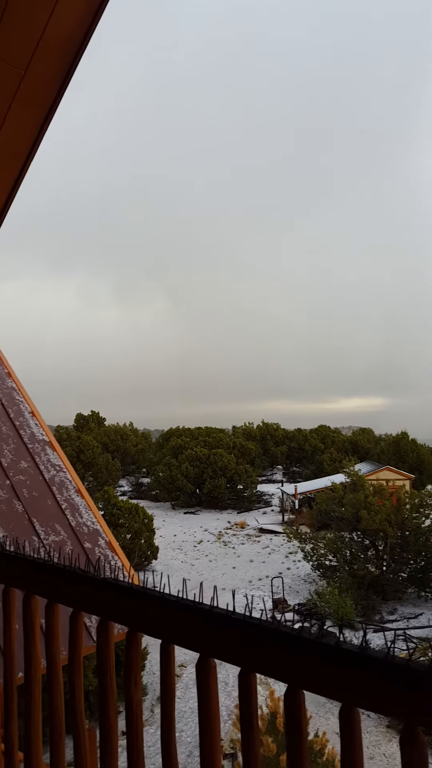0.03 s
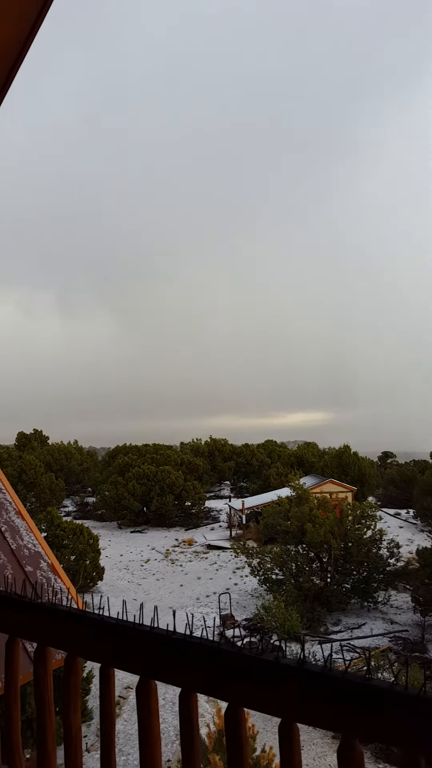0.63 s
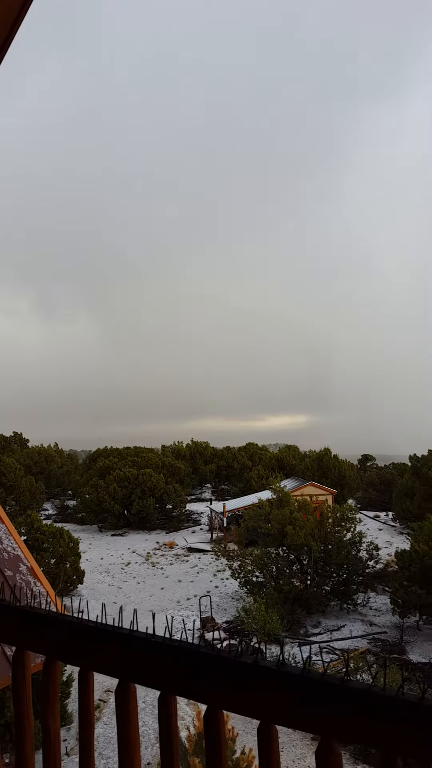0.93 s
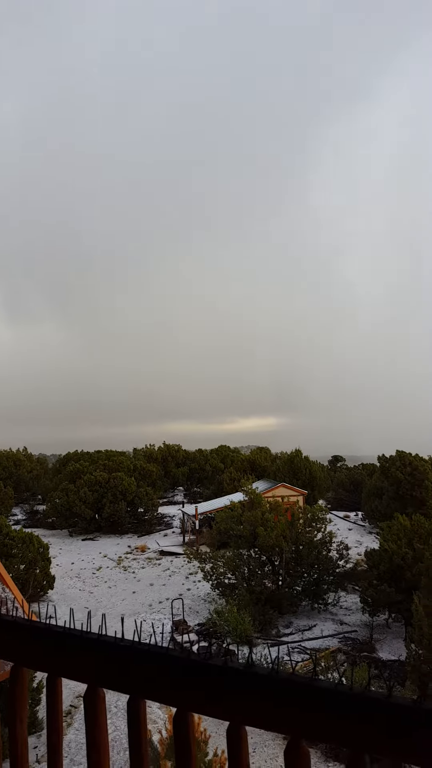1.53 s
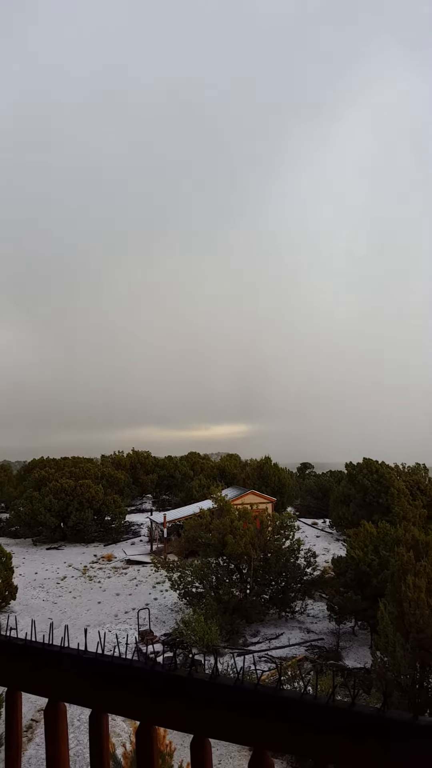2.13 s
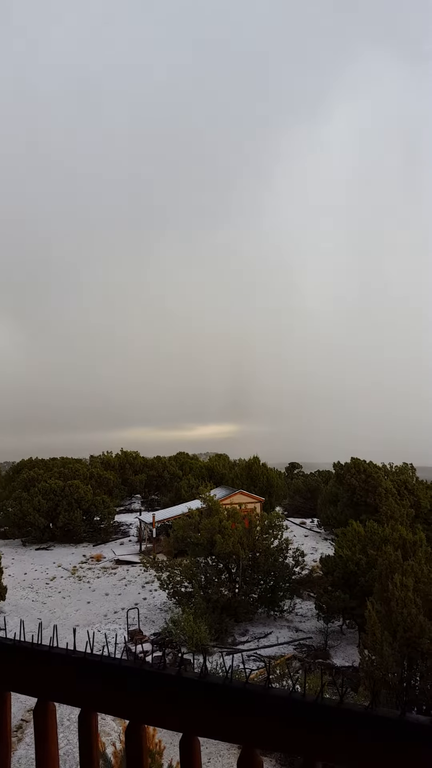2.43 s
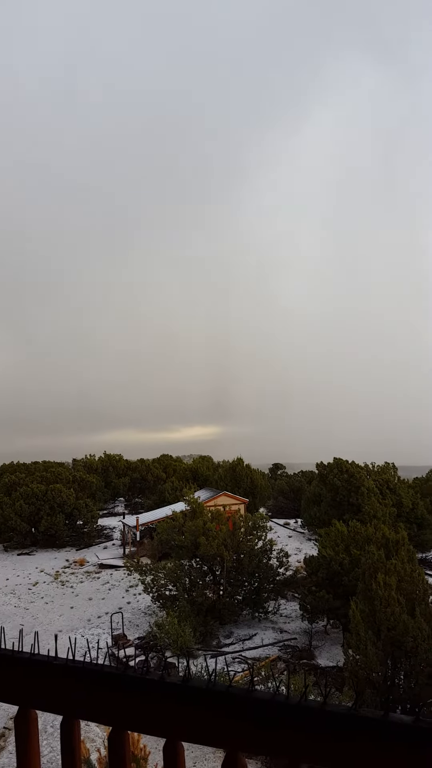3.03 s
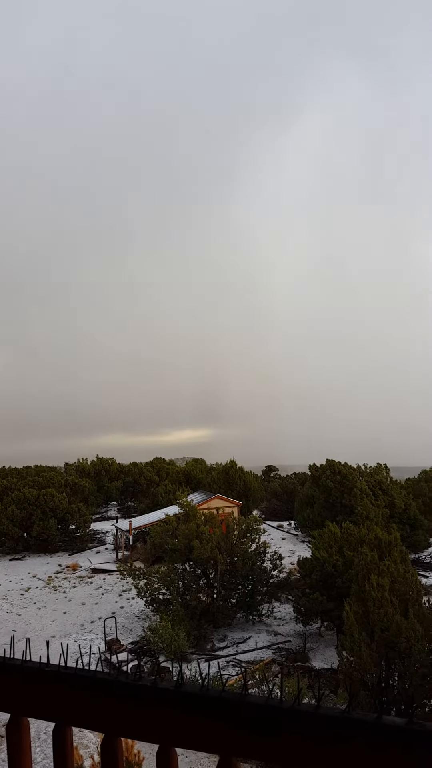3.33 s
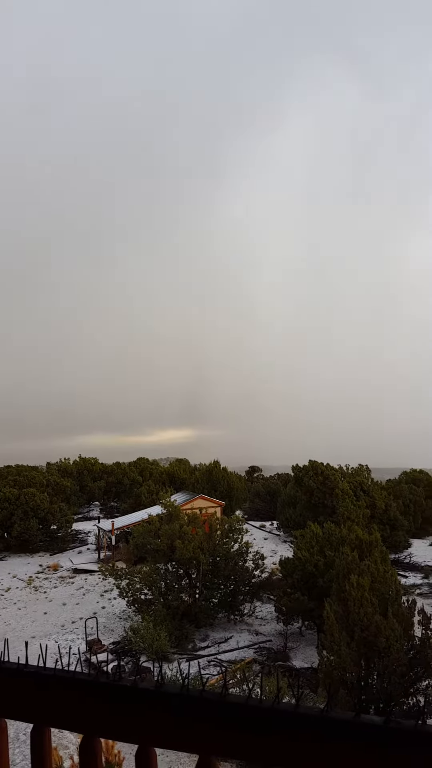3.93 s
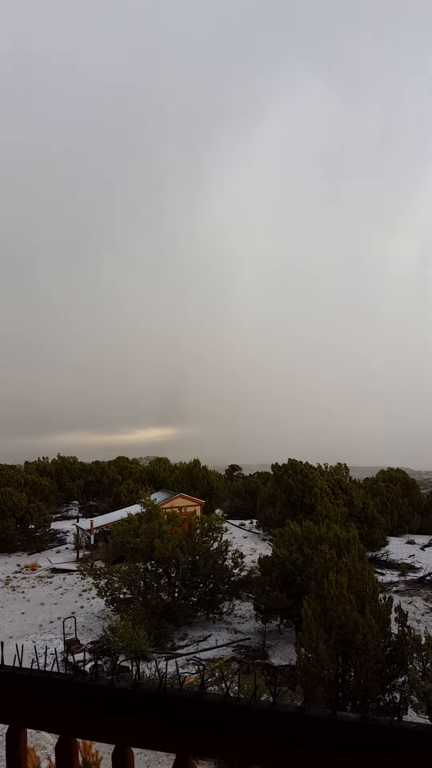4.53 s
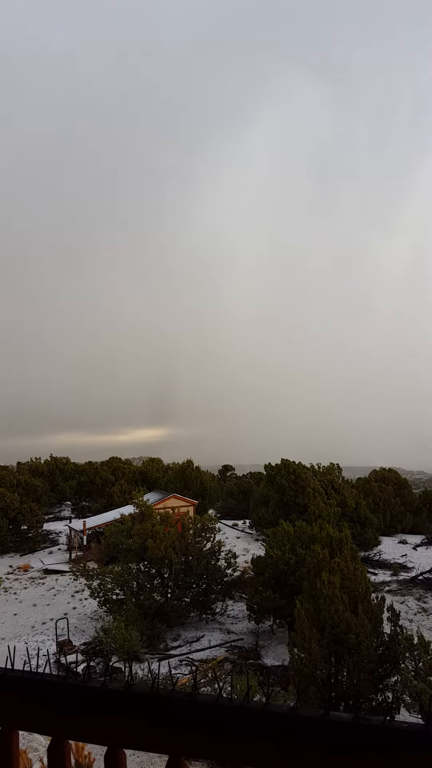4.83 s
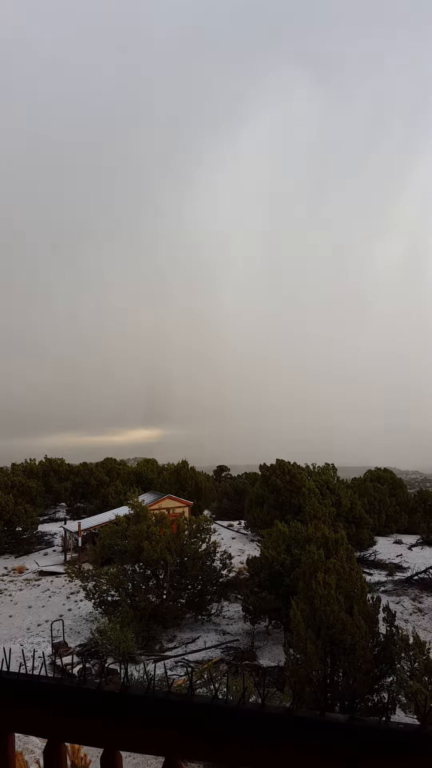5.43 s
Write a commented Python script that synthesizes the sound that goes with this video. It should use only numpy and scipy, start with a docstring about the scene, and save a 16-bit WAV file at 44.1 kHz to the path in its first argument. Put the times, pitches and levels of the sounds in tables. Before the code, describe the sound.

Fine sleet hisses softly outdoors, then a distant grumble swells into loud, booming thunder that keeps rolling and deepening.

```python
"""Thunder over a snowy valley

From a wooden balcony, under the eaves, in fine sleet. A faint grumble comes from far off; then crowds
of shock waves arrive from the lightning channel and swell into claps, deeper as the distance grows.
Pellets hiss, patter and rustle all round, a few ticks sound close to the microphone, and a low drone
lies underneath."""
import sys
import numpy as np
from scipy import signal
from scipy.fft import rfft, irfft, next_fast_len
from scipy.io import wavfile
from scipy.ndimage import uniform_filter1d, minimum_filter1d

SR = 44100
rng = np.random.default_rng(int(sys.argv[2]) if len(sys.argv) > 2 else 0)


def materialize(psi):
    """Save the field psi as 16-bit PCM at rate SR to the path in sys.argv[1].

    A 1-D psi becomes a single channel; in a 2-D psi each row is a channel.
    """
    bounded = np.clip(np.atleast_2d(psi).T, -1, 1)
    quanta = np.round(bounded * 32767).astype(np.int16)
    wavfile.write(sys.argv[1], SR, quanta)


N = 246959
T = np.arange(N) / SR
FFT_SIZE = next_fast_len(N, True)
HZ = np.maximum(np.arange(FFT_SIZE // 2 + 1) * SR / FFT_SIZE, 1)
ROLL_START_S = 2.229

# stereo width at the two microphone ports: (frequency [Hz], side minus mid [dB])
STEREO_WIDTH = [(50, -31), (150, -18.5), (300, -12.5), (500, -3.5), (660, -7.5), (950, 1), (1550, 4),
                (2400, -1), (5000, 4)]


def undb(db):
    """Decibels to gain."""
    return 10 ** (np.asarray(db) / 20)


def curves(table):
    """One gain over time for each level column of (time [s], level [dB], ...)."""
    times, *columns = np.transpose(table)
    return [undb(np.interp(T, times, db)) for db in columns]


def colour(points):
    """Gain at each frequency from (frequency [Hz], level [dB]) points."""
    hz, db = np.transpose(points)
    return undb(np.interp(np.log(HZ), np.log(hz), db))


def resonance(hz, width_hz):
    """Response of one damped resonance, gain 1 at its centre."""
    return 1 / (1 + 1j * (HZ / hz - hz / HZ) * hz / width_hz)


def peaks(modes):
    """Summed gain of resonant peaks given as (centre [Hz], width [Hz], level [dB])."""
    return sum(undb(db) * np.abs(resonance(hz, width)) ** 2 for hz, width, db in modes)


def below(hz, order):
    """Low-pass gain."""
    return 1 / np.sqrt(1 + (HZ / hz) ** (2 * order))


def causal(gain):
    """Minimum-phase response with this gain: it rings only after a blow."""
    cepstrum = irfft(np.log(gain + 1e-6), FFT_SIZE)
    first_half = np.arange(FFT_SIZE) < FFT_SIZE // 2
    return np.exp(rfft(2 * cepstrum * first_half) - cepstrum[0])


def through(x, response):
    """Filter by a frequency response."""
    return irfft(rfft(x, FFT_SIZE) * response, FFT_SIZE)[..., :N]


def ports():
    """Mid and side response of the microphone: bass is nearly the same at both ports."""
    return np.array([np.ones(len(HZ)), colour(STEREO_WIDTH)])


def unit(x):
    """Scale a mid and side pair so that the mid has rms 1."""
    return x / np.std(x[0])


def even(x, span_s):
    """Ride the gain of a mid and side pair so that the mid stays near rms 1 over each span."""
    power = uniform_filter1d(x[0] ** 2, int(span_s * SR))
    return x / np.sqrt(uniform_filter1d(power, int(span_s * SR / 2)) + 1e-18)


def impacts(per_s, spread_db):
    """Randomly timed impulses of uneven size, as mid and side."""
    hits = (rng.random((2, N)) < per_s / SR) * rng.standard_normal((2, N))
    return hits * undb(spread_db * np.minimum(rng.exponential(size=(2, N)), 4))


def swell(start_s, length_s, attack_s, release_s):
    """Envelope that rises, holds until its length is over, and dies away."""
    rise = np.clip((T - start_s) / attack_s, 0, 1)
    return rise * np.exp(-np.maximum(T - start_s - length_s, 0) / release_s)


def drone():
    """A steady, rough low drone in the background."""
    # peaks of the drone: (centre [Hz], width [Hz], level [dB])
    modes = [(52, 70, -8), (87.8, 13, 5.5), (101.7, 7.7, 3.5), (125.7, 17, 5), (155.3, 8.8, 1),
             (159, 36, -8), (240, 150, -8), (360, 210, -15.5), (727, 310, -11.5)]
    hum = even(through(rng.standard_normal((2, N)), peaks(modes)), span_s=0.11)
    return undb(-42) * through(hum, ports())


def sleet():
    """Far pellets merge into hiss; near ones patter on the wooden rail. Both come in small flurries."""
    # the fall slowly eases: (time [s], level [dB])
    easing = [(0.02, -51.5), (.82, -52.5), (.92, -54), (1.05, -52.5), (1.93, -54), (3.7, -56),
              (4.88, -57.5), (5.42, -56), (5.5, -58)]
    # spectrum of the far pellets: (frequency [Hz], level [dB])
    hiss_colour = [(700, 9.5), (1000, 2.5), (1400, 6.5), (2200, 3), (2700, 3.5), (3400, -1.5), (4300, -1),
                   (9200, -8), (11800, -6.7), (13300, -6), (14700, -10), (15600, -16)]
    far_flurry, near_flurry = unit(through(rng.standard_normal((2, N)), below(11.4, order=2)))
    # each pellet skitters for a moment where it lands
    skitter = rfft(rng.standard_normal(N) * np.exp(-T / .0025), FFT_SIZE)
    wash = rng.standard_normal((2, N))
    pellets = unit(through(impacts(per_s=900, spread_db=3), skitter))
    tone = colour(hiss_colour) * (1 - below(260, order=1))
    hiss = through(wash + undb(-4.5) * pellets, causal(tone))
    hiss /= np.std(through(hiss[0], HZ > 3500))  # the treble sets the level
    patter = unit(through(impacts(per_s=1800, spread_db=-2.5), resonance(2700, 2500) ** 2))
    fall = undb(1 + .8 * far_flurry) * hiss + undb(-13.5 + 7 * np.tanh(near_flurry)) * patter
    return curves(easing)[0] * fall


def rustles():
    """Brief soft swells of fine grains in the sleet."""
    # rustles: (start [s], length [s], level [dB], centre [Hz])
    swells = [(0.05, 0.03, -49.5, 2390), (0.517, 0.034, -50.5, 2000), (0.757, 0.088, -52, 2100),
              (0.962, .018, -52, 4470), (1.047, 0.097, -50.5, 2100), (1.712, 0.024, -46.5, 1500),
              (1.977, .04, -53, 2480), (3.155, 0.056, -55.5, 5950), (3.365, 0.14, -55, 6900),
              (5.047, 0.045, -52.5, 5000), (5.205, 0.098, -59, 4970)]
    out, q = np.zeros((2, N)), 0.52
    for start, length, db, hz in swells:
        grains = unit(through(impacts(per_s=9000, spread_db=1.5), resonance(hz, hz / q) ** 2))
        out += undb(db) * swell(start, length, attack_s=0.011, release_s=0.016) * grains
    return out


def ticks():
    """Short ticks close to the microphone, each with a weak tail off the wooden walls."""
    # close ticks: (time [s], level [dB], centre [Hz], width [Hz], decay [s])
    hits = [(0.2653, -45, 4200, 3000, 0.0033), (.315, -45, 3000, 4000, .003), (0.45, -48, 3200, 4000, .004),
            (0.756, -45, 3200, 2400, 0.0055), (.81, -41.5, 1900, 1800, .007),
            (0.8598, -44.5, 4500, 6000, 0.011), (0.9625, -45, 4200, 5000, 0.007),
            (1.059, -50, 5500, 5000, .003), (1.432, -47, 4500, 8000, .008), (3.2025, -47, 5000, 8000, .003),
            (3.961, -35.5, 4440, 3370, 0.0038), (3.966, -46, 3600, 4500, 0.025),
            (4.3683, -37.5, 9500, 5000, 0.0016), (5.054, -50, 13000, 9000, 0.018),
            (5.1507, -44, 8500, 6000, .002), (5.288, -52, 12500, 6000, 0.0073)]
    out, size = np.zeros((2, N)), 8192
    age = T[:size]
    burst_hz = np.arange(size // 2 + 1) * SR / size
    attack = 1 - np.exp(-age / .0004)
    wall_tail = undb(-16) * np.exp(-age / .025)
    for time, db, hz, width, decay in hits:
        envelope = attack * (np.exp(-age / decay) + wall_tail)
        tone = np.interp(burst_hz, HZ, np.abs(resonance(hz, width)) ** 2)
        burst = unit(irfft(rfft(rng.standard_normal((2, size))) * tone))
        start = int(time * SR)
        out[:, start:start + size] += undb(db) * envelope * burst
    return out


def grumble():
    """The first weak shocks from far off ring the balcony until the main peal takes over."""
    # far grumbles, each round its own pitch: (start [s], length [s], level [dB], pitch [Hz])
    swells = [(0.0, 0.35, -56, 331), (.64, 0.09, -52.5, 313), (0.774, 0.031, -41.5, 300),
              (1.011, 0.085, -41.5, 294), (1.203, 0.079, -41, 294), (1.465, 0.023, -40.5, 293),
              (1.579, 0.089, -40.5, 301), (1.709, 0.09, -42.5, 287), (1.969, 0.094, -38, 285),
              (2.327, 0.14, -32, 288), (2.509, 0.12, -30.5, 269)]
    # resonances of the balcony: (centre [Hz], width [Hz], level [dB])
    balcony_modes = [(223, 6.1, 1), (373, 8.9, -11), (382, 73, -6), (650, 22, -7.5), (710, 34, -11.5),
                     (840, 430, -17)]
    out = np.zeros((2, N))
    balcony = peaks(balcony_modes)
    shocks = impacts(per_s=1300, spread_db=3.5)
    for start, length, db, hz in swells:
        tone = balcony + undb(7) * np.abs(resonance(hz, width_hz=22)) ** 2
        ring = even(through(shocks, tone), span_s=0.045)
        out += undb(db) * swell(start, length, attack_s=0.028, release_s=0.058) * ring
    return through(out, ports())


def booms():
    """Hollow booms: shocks that follow each other at a near-even pace gather round one pitch."""
    # booms: (peak time [s], half length [s], centre [Hz], width [Hz], level [dB])
    swells = [(2.236, 0.0062, 236, 50, -27.5), (2.635, .02, 300, 28, -28.5), (2.7, 0.031, 49.7, 54, -24),
              (2.787, 0.13, 182.5, 10, -22), (2.773, 0.028, 232.5, 14, -24), (2.818, 0.047, 798, 75, -23),
              (2.823, 0.044, 55.6, 62, -27), (2.92, 0.017, 144, 68, -18), (3.02, 0.022, 220, 71, -22),
              (3.334, .06, 48, 40, -36), (3.691, 0.019, 92, 26, -28.5), (3.775, 0.014, 99, 23, -21),
              (4.01, 0.014, 105, 24, -19), (4.212, 0.022, 104, 15, -30.5), (4.458, 0.016, 100, 49, -19),
              (4.575, 0.012, 99, 24, -20.5), (4.718, 0.0116, 123, 47, -15), (4.89, 0.023, 121, 41, -21),
              (4.95, 0.014, 168, 64, -15.5), (5.076, 0.035, 170.7, 26, -21.5), (5.104, 0.026, 45, 41, -22),
              (5.205, 0.018, 175, 28, -21), (5.388, 0.021, 270, 25, -18), (5.356, 0.016, 176, 43, -21),
              (5.462, 0.0076, 104, 58, -20)]
    out = np.zeros((2, N))
    for time, half_length, hz, width, db in swells:
        ring = even(through(rng.standard_normal((2, N)), resonance(hz, width) ** 2), span_s=0.078)
        out += undb(db) * np.exp(-.5 * ((T - time) / half_length) ** 2) * ring
    return through(out, ports())


def cracks():
    """Abrupt volleys of shocks from kinks in the channel, their top dulled by the air."""
    # cracks within the roll: (start [s], length [s], level [dB], centre [Hz])
    volleys = [(2.232, 0.0086, -37, 1100), (2.263, .008, -35, 1500), (2.399, 0.013, -30.5, 1200),
               (2.607, 0.0087, -26.5, 740), (2.686, 0.014, -27.5, 890), (2.774, 0.054, -23.5, 446),
               (2.965, 0.016, -27.5, 1100), (3.01, 0.024, -24, 373), (3.287, 0.026, -29.5, 450),
               (3.803, 0.028, -31.5, 1200), (3.91, 0.015, -31, 650), (3.968, .008, -30, 1300),
               (3.997, 0.012, -27.5, 875), (4.327, 0.015, -26, 1310), (4.802, 0.016, -32, 600),
               (5.189, 0.011, -25, 1030), (5.344, 0.023, -26, 700), (5.473, 0.017, -26, 885)]
    out, q = np.zeros((2, N)), 0.86
    path = below(1620, order=5) * ports()
    shocks = impacts(per_s=4400, spread_db=3.5)
    for start, length, db, hz in volleys:
        volley = even(through(shocks, path * resonance(hz, hz / q) ** 2), span_s=0.02)
        out += undb(db) * swell(start, length, attack_s=0.0097, release_s=0.0077) * volley
    return out


def valley_path():
    """Response to one shock that crosses the valley air and rings the space under the eaves."""
    # spectrum of the thunder: (frequency [Hz], level [dB])
    shock_colour = [(20, -79), (42, -8), (62, -15), (88, 3.5), (135, 2.5), (205, -5.5), (330, -7),
                    (450, -8.5), (820, -9), (1200, -19), (1600, -20), (2100, -27), (3000, -56.5)]
    # resonances under the eaves: (centre [Hz], width [Hz], level [dB])
    eaves_modes = [(170, 15, 3), (182, 6.2, 4), (266, 5, -0.5), (296, 22, -1), (371, 19, -3.5),
                   (601, 53, -6.5)]
    eaves_power = sum(np.abs(2 * undb(db) * resonance(hz, width)) ** 2 for hz, width, db in eaves_modes)
    air = below(2080, order=4)
    return causal(colour(shock_colour) * np.sqrt(1 + eaves_power) * air)


def claps(path):
    """Stretches of channel side-on to the microphone arrive as one shock: near ones bang, far ones thud."""
    # strong single shocks: (time [s], peak level [dB], dulled above [Hz])
    arrivals = [(2.262, -24, 1800), (2.541, -14, 1090), (2.67, -12, 800), (2.743, -15, 500),
                (2.809, -16, 700), (2.83, -10.5, 1200), (2.86, -10, 900), (2.933, -10, 900),
                (2.983, -10, 1200), (3.018, -14, 600), (3.167, -24, 250), (3.279, -30, 300),
                (3.39, -21, 400), (3.525, -25, 700), (3.654, -20, 250), (3.827, -19, 200),
                (3.912, -17, 900), (3.973, -17, 347), (4.332, -16, 500), (4.456, -17, 250),
                (4.699, -16, 600), (4.719, -19, 180), (4.805, -15, 250), (4.827, -18, 180),
                (4.874, -16, 400), (4.896, -8.5, 250), (4.954, -20, 222), (5.116, -17, 700),
                (5.207, -12, 250), (5.223, -6, 1000), (5.363, -9.5, 400), (5.518, -17, 350)]
    out, size = np.zeros(N), 8192
    front = irfft(path, FFT_SIZE)[:size]
    for time, db, cutoff_hz in arrivals:
        shock = signal.sosfilt(signal.butter(2, cutoff_hz, fs=SR, output="sos"), front)
        shock /= np.abs(shock).max()
        start = int(time * SR)
        out[start:start + size] += undb(db) * shock[:N - start]
    return np.array([out, undb(-20) * out])


def roll_gains():
    """Gains of the roll's five bands, low to high: surges add their power to the scattered rumble."""
    # rumble between the surges: (time [s], level [dB], extra crackle [dB])
    rumble_levels = [(2.25, -33, 1), (3.1, -30.5, 4.5), (3.23, -32, 2), (3.4, -31, 3), (3.6, -30.5, -1),
                     (3.93, -31, 3.5), (4.1, -30, 0), (4.24, -30, 4.5), (4.38, -27, 4), (4.68, -30, 3),
                     (4.76, -31, 3.5), (4.84, -25, -1.5), (5.02, -25.5, -3), (5.6, -20.5, -2)]
    # one surge for each stretch of the channel:
    # (start [s], length [s], level [dB], extra bass [dB], extra crackle [dB])
    surges = [(2.252, 0.018, -34, 9, 8), (2.325, 0.15, -33, 0.5, 4.5), (2.528, 0.015, -37.5, 7, 16),
              (2.611, 0.021, -32, -7.5, -9), (2.646, 0.09, -21, -10, -1.5), (2.747, 0.1, -20, -1, -0.5),
              (2.833, 0.17, -23, -2.5, 6), (3.113, 0.064, -26, 2, -1.5), (3.247, 0.072, -29, -1.5, -4),
              (3.361, 0.039, -27, -0.5, -1), (3.43, 0.033, -34.5, 7, 7.5), (3.63, 0.073, -27.5, -0.5, -13),
              (3.73, 0.087, -27, -1, -24), (3.791, 0.058, -30, -4, 7), (3.942, 0.089, -28.5, -2, 4),
              (4.138, 0.093, -27, 0, -7), (4.31, 0.029, -26.5, -2, -8), (4.396, 0.11, -27, 1.5, 1.5),
              (4.517, 0.081, -23.5, 0.5, 3.5), (4.625, 0.093, -22, -7, -11), (4.78, 0.037, -26, 6, -14),
              (4.849, 0.039, -18.5, -3, -8), (4.9, 0.032, -30, -1, -18), (5.083, 0.041, -21.5, -15, -11),
              (5.164, 0.09, -23.5, 4, -7), (5.307, 0.13, -25, -9, -0.5), (5.44, 0.062, -21, 5, -12)]
    rumble, extra_crackle = curves(rumble_levels)
    power = np.array([rumble, rumble, rumble * extra_crackle]) ** 2
    for start, length, db, bass_db, crackle_db in surges:
        surge = undb(db) * swell(start, length, attack_s=0.021, release_s=0.028)
        power += np.outer([undb(bass_db), 1, undb(crackle_db)], surge) ** 2
    bass, body, crackle = np.sqrt(power)
    deepen_db_per_s = 1.2  # later shocks come from farther off and are deeper
    bass *= undb(deepen_db_per_s * (T - ROLL_START_S))
    return undb(-16) * bass, undb(-5) * bass, undb(-4.5) * body, undb(-4.2) * body, undb(-11.5) * crackle


def thunder_roll(path):
    """Shocks from all along the lightning channel: near stretches crackle, far ones only boom."""
    direct = unit(impacts(per_s=2200, spread_db=0.5))
    scattered = undb(1.5) * rng.standard_normal((2, N))  # off the hills and trees
    shocks = through(direct + scattered, path * ports())
    crossovers = [below(70, order=7), below(215, order=8), below(430, order=8), below(1000, order=6), 1]
    deep_gain, *band_gains = roll_gains()
    roll = deep_gain * even(through(shocks, crossovers[0]), span_s=0.62)
    for low, high, gain in zip(crossovers, crossovers[1:], band_gains):
        band = through(shocks, np.sqrt(np.abs(high ** 2 - low ** 2)))
        roll += gain * even(band, span_s=0.1)
    # early arrivals cross less air and keep a tearing edge; later ones lose it
    travel_loss = np.exp(-np.maximum(T - ROLL_START_S, 0) / 2.4)
    tearing_tone = np.abs(resonance(2180, 1200)) ** 3 * below(3400, order=6)
    tearing = unit(through(impacts(per_s=900, spread_db=-1), tearing_tone))
    crackle_gain = band_gains[-1] / band_gains[-1].max()
    roll += undb(-40) * travel_loss * crackle_gain ** 1.24 * tearing
    onset = np.clip((T - ROLL_START_S) / .008, 0, 1)
    return roll * onset


def scene():
    """All sources at the balcony as mid and side, turned into left and right."""
    # balance of the two microphone ports: (frequency [Hz], left minus right [dB])
    balance = [(100, -0.55), (480, 0.5), (900, -1.5), (1200, -4.5), (1500, -6), (2200, -1.5), (4400, -0.5),
               (8100, 1.5), (13000, -0.5)]
    path = valley_path()
    thunder = thunder_roll(path) + claps(path) + cracks() + booms() + grumble()
    soft_ends = np.clip(np.minimum(T, T[-1] - T) / .004, 0, 1)
    mid, side = (thunder + drone() + sleet() + rustles() + ticks()) * soft_ends
    lean = np.sqrt(colour(balance))
    return through(np.array([mid + side, mid - side]), np.array([lean, 1 / lean]))


def record(dry):
    """The phone drops the deepest bass, limits the loudest peaks and cuts the top."""
    bottom_hz, top_hz, ceiling = 24, 15600, .68
    dry = signal.sosfilt(signal.butter(2, bottom_hz, "high", fs=SR, output="sos"), dry)
    # the limiter ducks smoothly round each peak that passes the ceiling
    needed_gain = np.minimum(1, ceiling / (np.abs(dry).max(axis=0) + 1e-9))
    held_gain = minimum_filter1d(needed_gain, size=600)
    gain = uniform_filter1d(uniform_filter1d(held_gain, size=300), size=300)
    return signal.sosfilt(signal.ellip(10, .2, 80, top_hz, fs=SR, output="sos"), dry * gain)


dry = scene()
out = record(dry)
materialize(out)
```